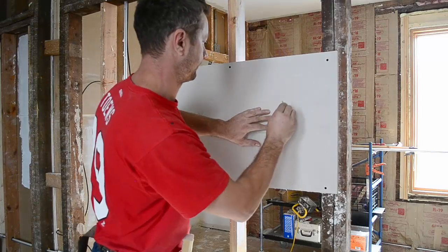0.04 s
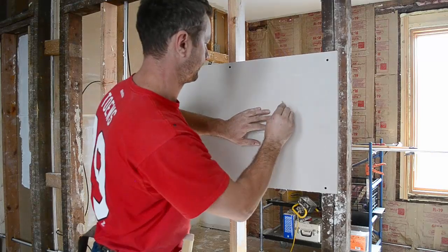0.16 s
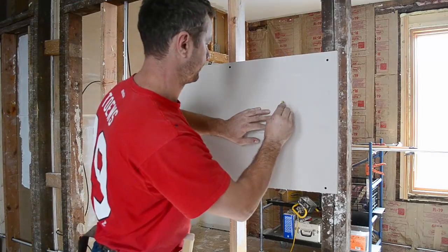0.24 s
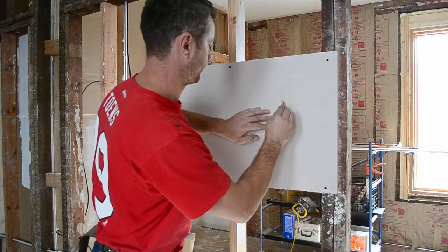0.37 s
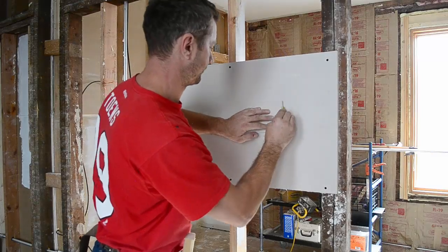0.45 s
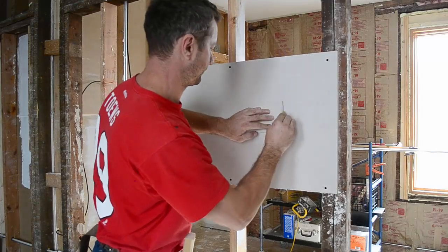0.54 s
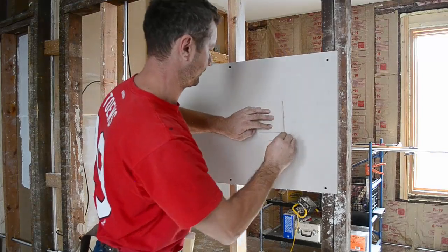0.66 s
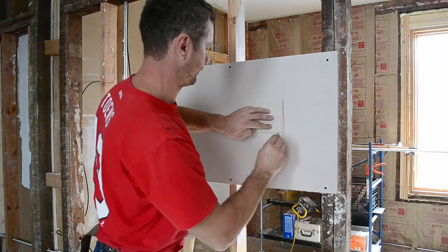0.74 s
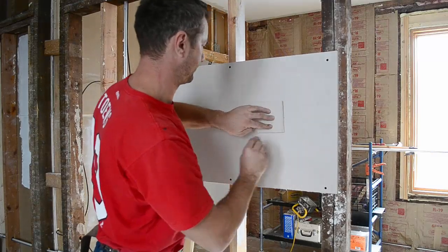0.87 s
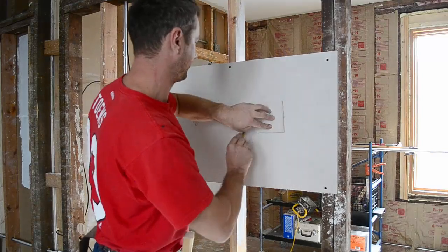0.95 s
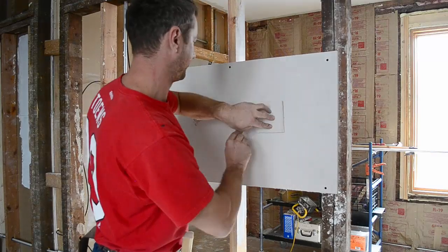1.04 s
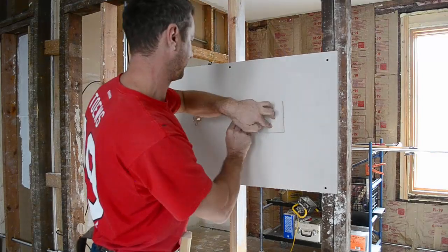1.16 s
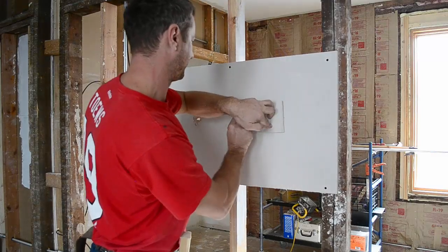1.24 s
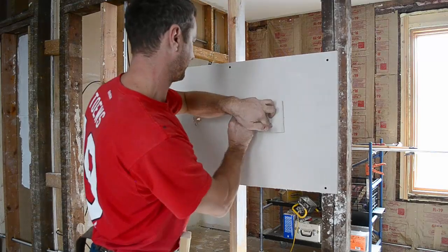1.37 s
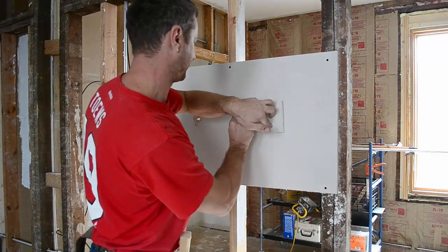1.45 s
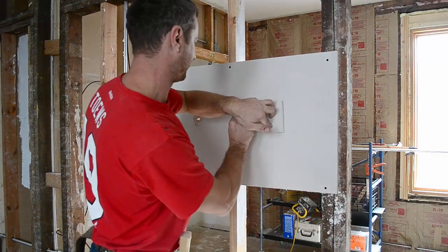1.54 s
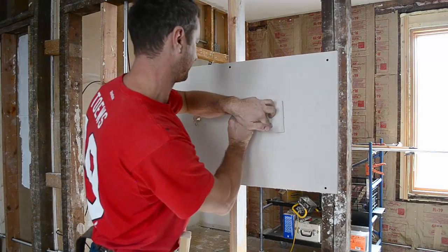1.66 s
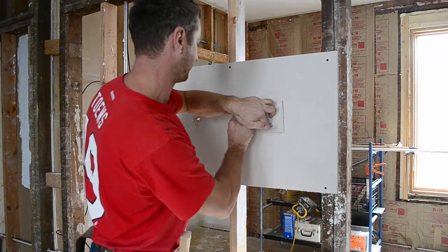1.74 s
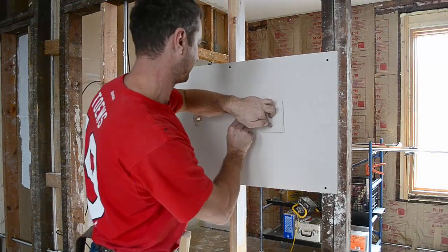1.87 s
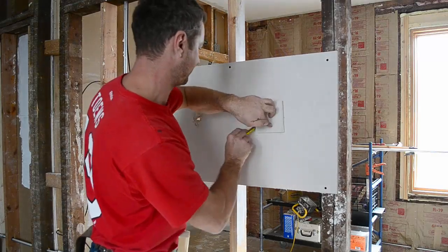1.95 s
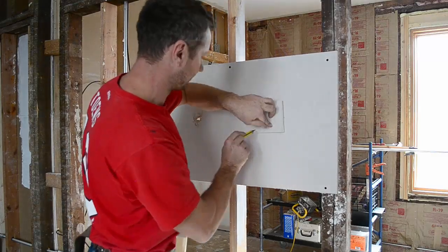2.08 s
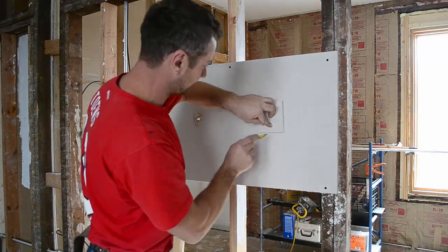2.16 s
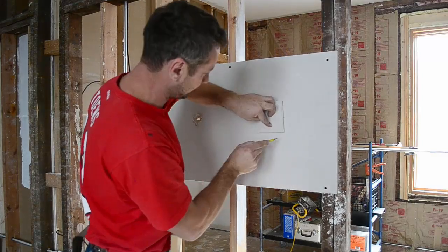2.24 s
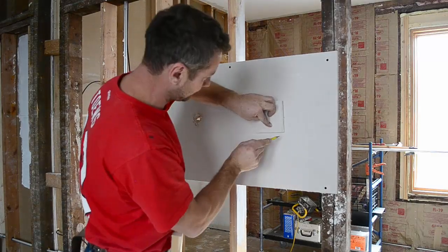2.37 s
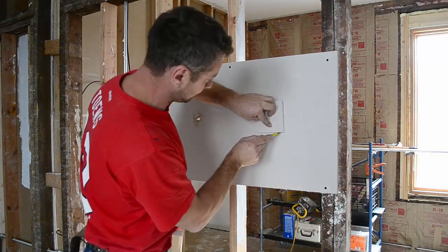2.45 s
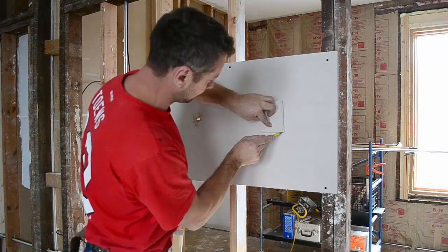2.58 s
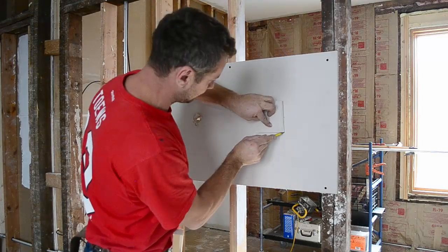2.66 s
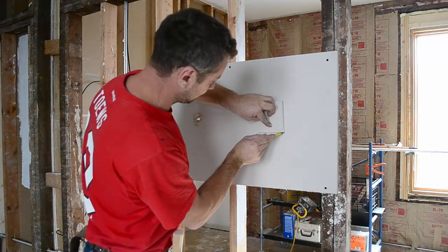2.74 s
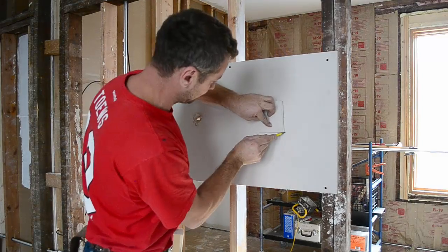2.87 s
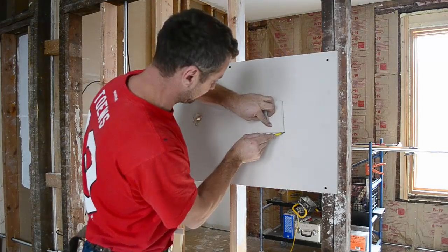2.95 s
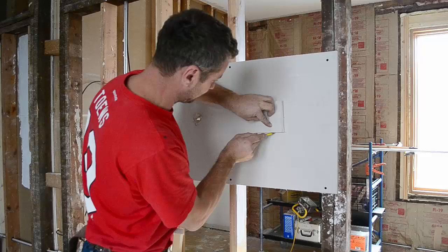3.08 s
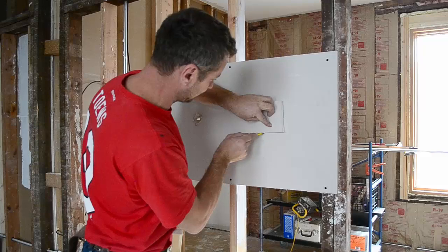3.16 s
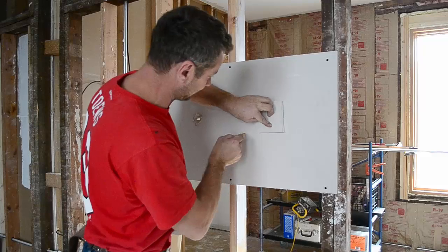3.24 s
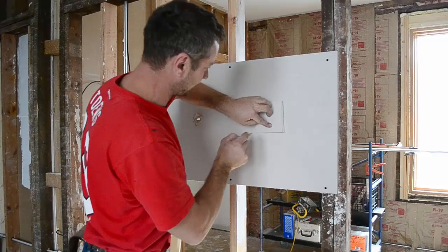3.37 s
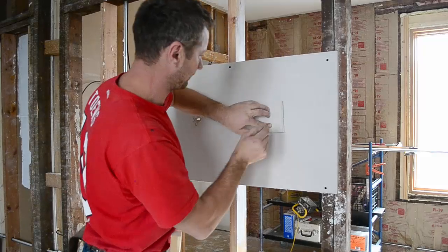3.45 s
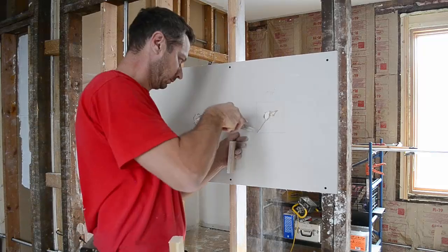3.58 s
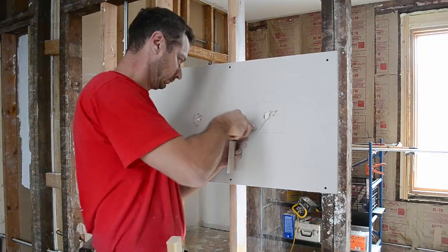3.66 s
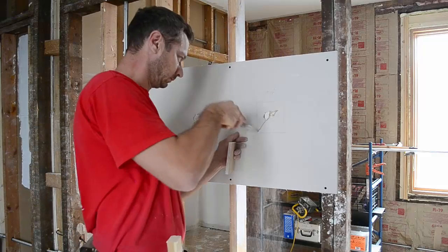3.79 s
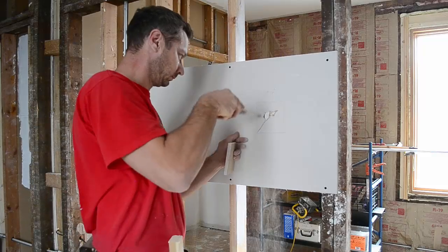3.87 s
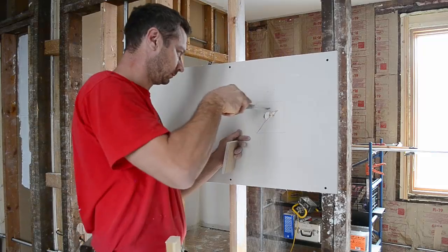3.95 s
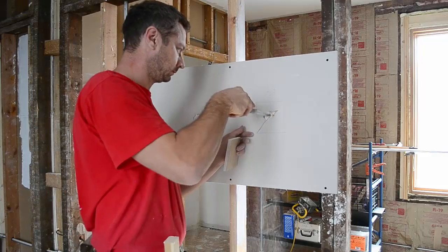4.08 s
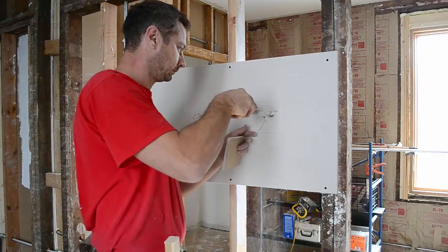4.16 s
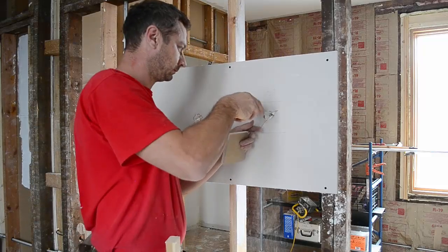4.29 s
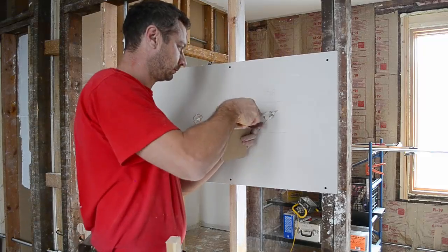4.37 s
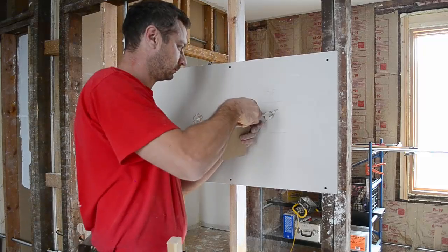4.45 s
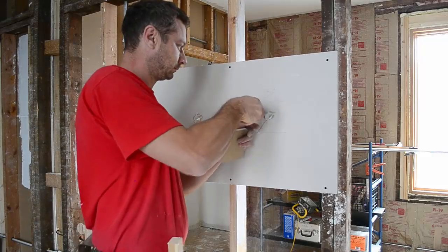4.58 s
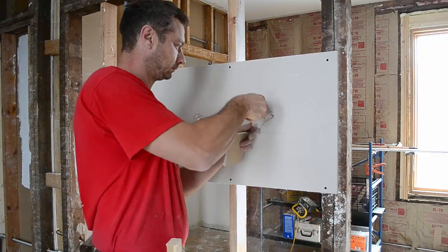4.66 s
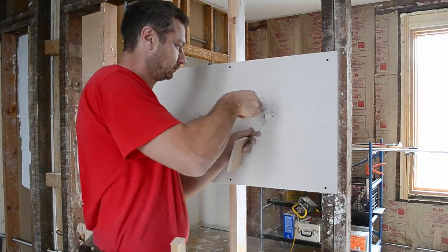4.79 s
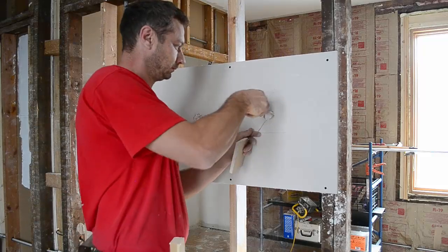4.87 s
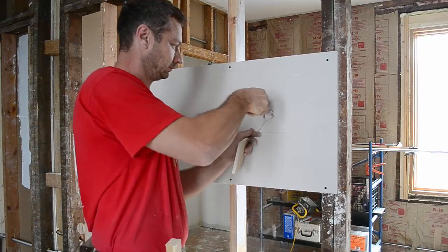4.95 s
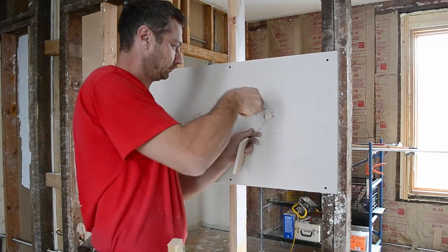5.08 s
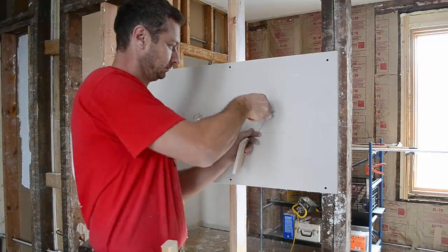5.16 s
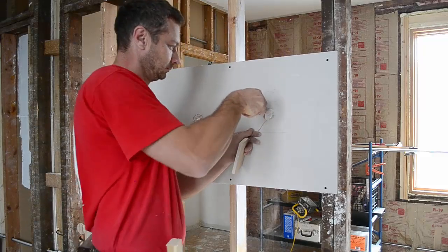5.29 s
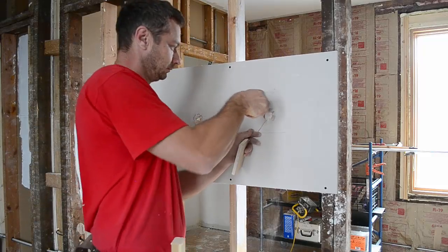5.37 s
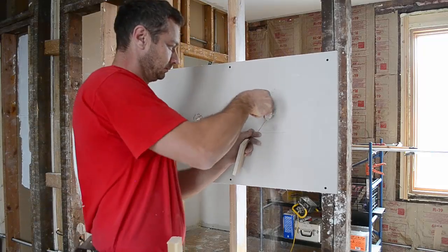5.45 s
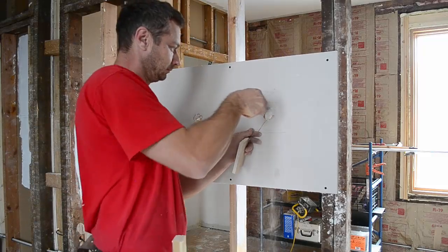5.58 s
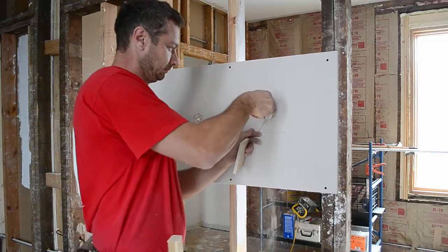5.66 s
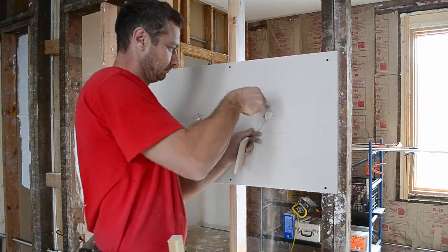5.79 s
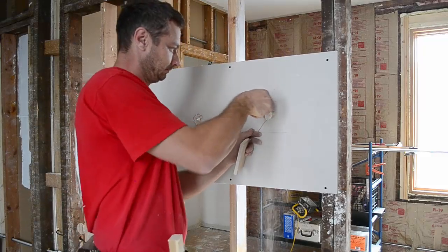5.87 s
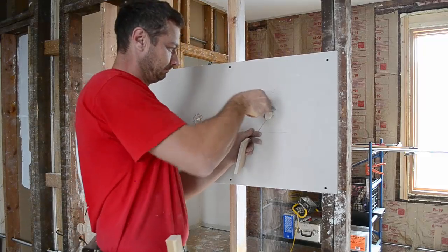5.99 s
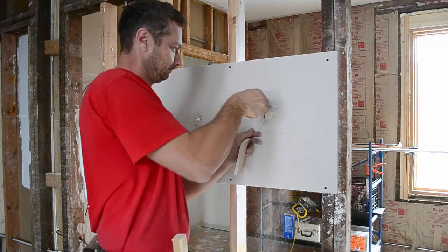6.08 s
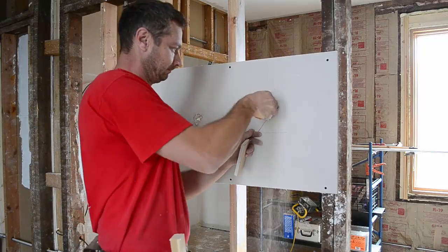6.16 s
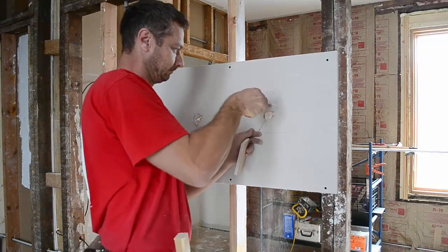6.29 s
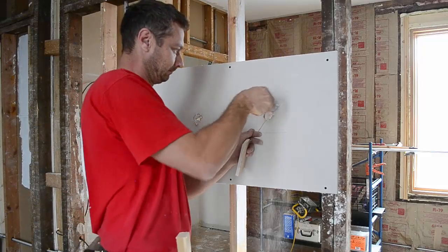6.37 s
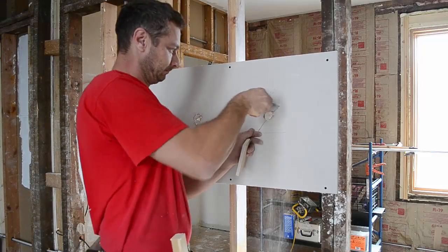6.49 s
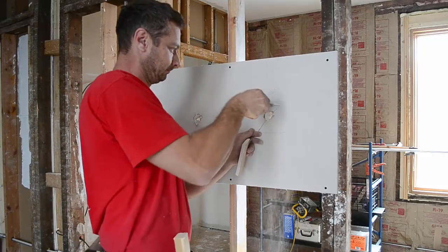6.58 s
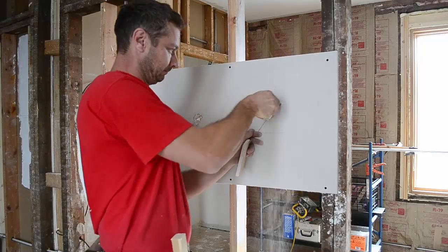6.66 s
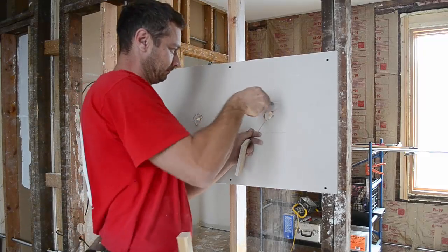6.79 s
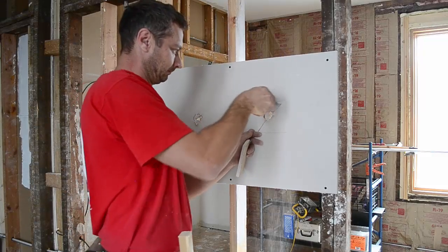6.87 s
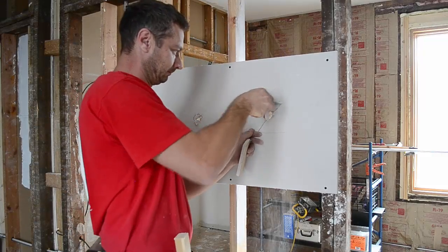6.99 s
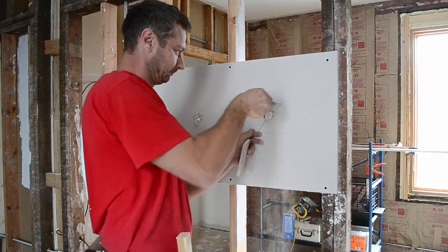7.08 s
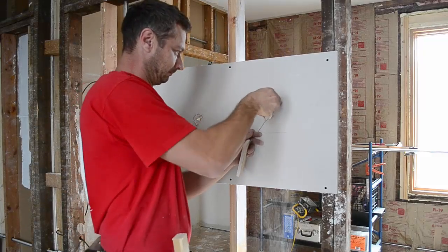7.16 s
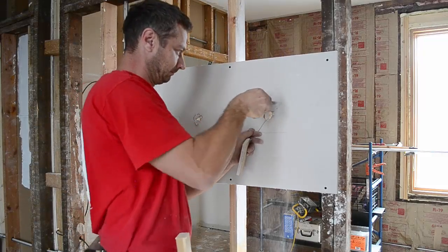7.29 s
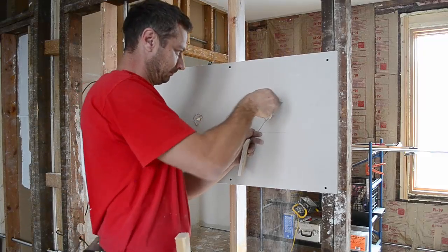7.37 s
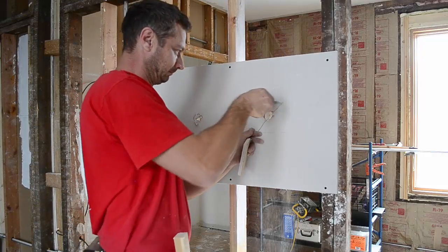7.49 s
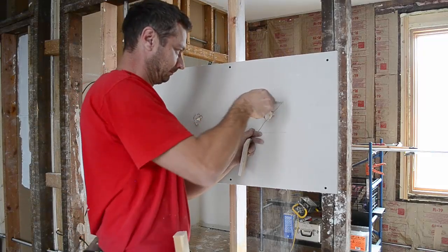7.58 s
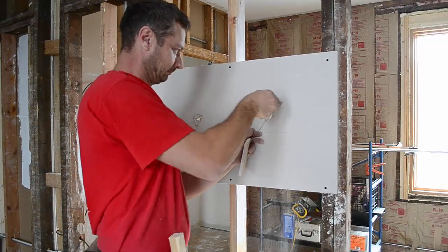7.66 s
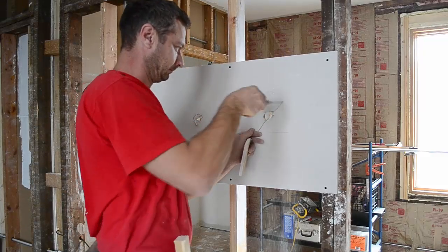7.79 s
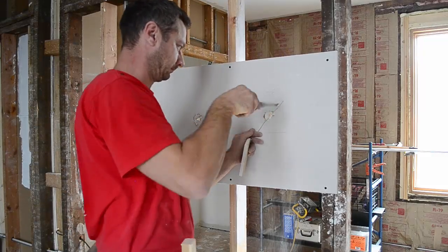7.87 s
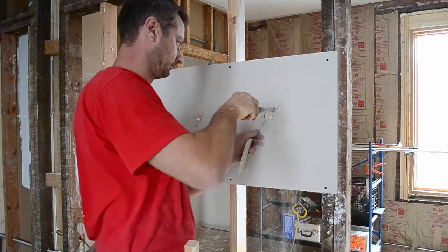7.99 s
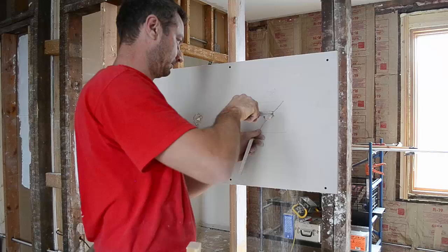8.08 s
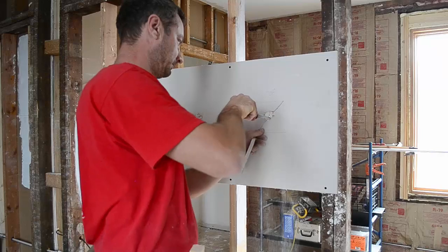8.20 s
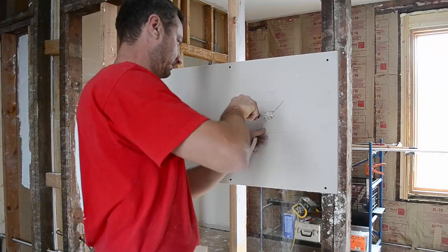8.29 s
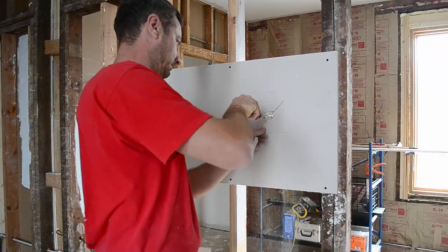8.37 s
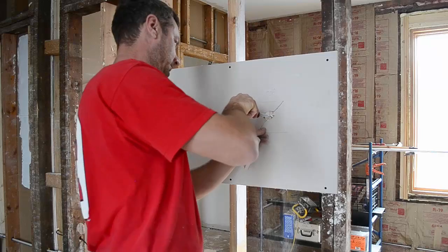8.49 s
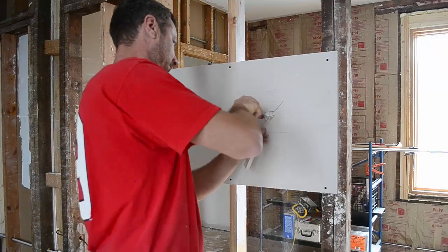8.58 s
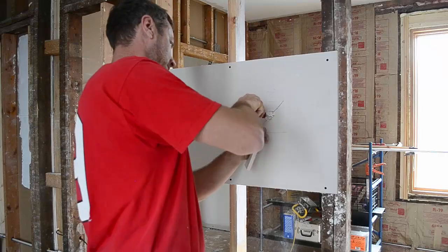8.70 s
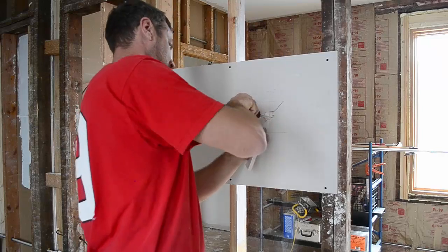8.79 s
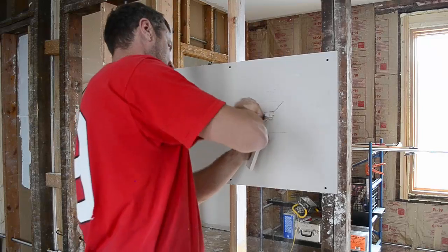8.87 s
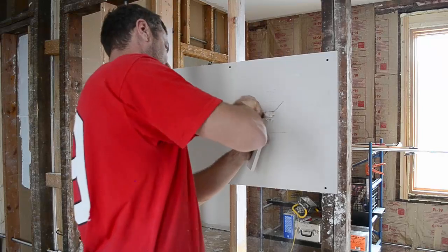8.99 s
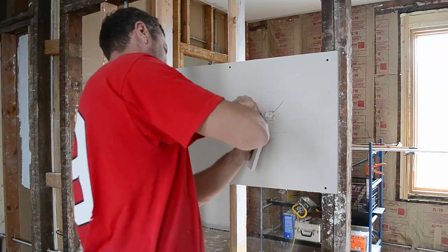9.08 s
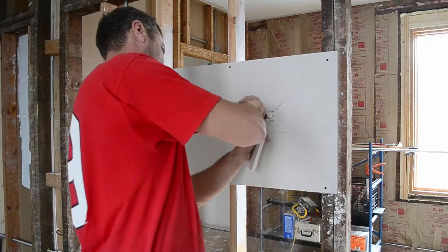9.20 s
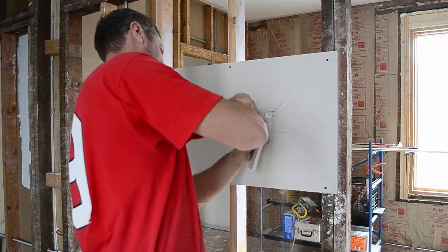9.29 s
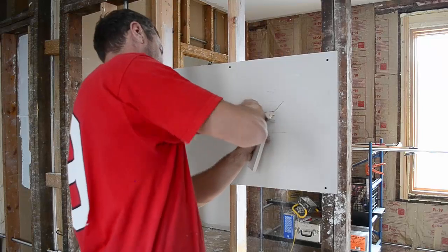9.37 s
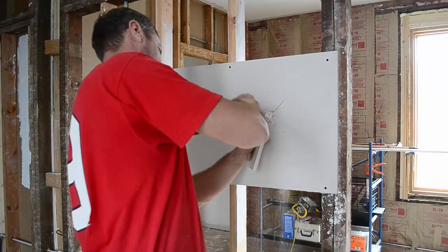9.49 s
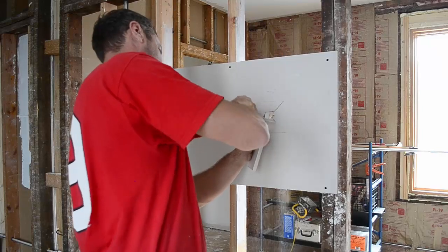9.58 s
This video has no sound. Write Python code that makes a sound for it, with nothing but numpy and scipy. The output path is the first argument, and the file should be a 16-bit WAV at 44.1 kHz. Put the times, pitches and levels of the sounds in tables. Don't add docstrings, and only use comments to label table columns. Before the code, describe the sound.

Soft steady air in a bare, short-echoing room. From 0.2 s come faint taps on a drywall sheet, then a dry pencil scratch from 0.4 to 0.7 s. Small knocks and ticks follow; a second line hisses, swelling, from 1.7 to 2.0 s, then more tiny ticks, and a third from 3.0 to 3.27 s ends in a small bright click. At 3.54 s the sound jumps abruptly to loud sawing: a couple of strokes, then blade scrapes and clicks. From 4.2 s teeth chatter sharply and knock; from 4.6 s slower strokes start, with a hard knock at 5.1 s, becoming fast regular push-pull rasps, thumping, rattling, gritty, the sheet groaning and ringing, until 7.8 s. Light rubbing and ticks fill 7.9 to 8.5 s. From 8.55 s sawing returns, rougher and more ringing, with uneven snags, continuing to the end near 9.7 s.

```python
import sys
import numpy as np
from scipy import signal
from scipy.fft import rfft, irfft
from scipy.io import wavfile
from scipy.ndimage import uniform_filter1d

SR = 44100
rng = np.random.default_rng(int(sys.argv[2]) if len(sys.argv) > 2 else 0)


def amplitude_ratio(level_db):
    exponent = np.asarray(level_db, float) / 20
    return 10 ** exponent


def bounce(signal):
    frames = np.transpose(np.atleast_2d(signal))
    limited = np.clip(frames, -1, 1)
    pcm = np.round(limited * 32767).astype(np.int16)
    wavfile.write(sys.argv[1], SR, pcm)


N = 425124
T = np.arange(N) / SR

CUTS_S = [
    3.537,
    4.181,
    8.539,
]
# time_s, peak_db
SEAMS = [
    (3.2695, -43),
    (3.5359, -53),
    (5.5363, -38),
    (6.536, -33),
    (7.5363, -47),
    (9.5376, -32),
]
# hz, level_db_per_hz
AIR_TONE = [(15, -26), (28, -12), (48, -7), (70, -15), (112, 2.5), (173, -6), (343, -2), (410, -7),
            (503, -0.5), (4960, -15), (9140, -27), (10900, -46.5), (14200, -78), (22000, -120)]
# hz, t60_s
ROOM_T60 = [(150, 0.15), (1000, 0.35), (7000, 0.33)]
# time_s, peak_db, pitch_hz
KNOCKS = [(0.1916, -37, 630), (.2755, -34.5, 720), (0.31, -35.5, 343), (.979, -48, 520), (1.146, -42, 313),
          (1.387, -37.5, 346), (1.441, -44, 620), (1.459, -36, 940), (1.735, -46, 885), (2.473, -39.5, 507),
          (2.98, -34, 830), (3.537, -10, 367), (4.596, -12, 295), (4.844, -25, 420), (5.124, -3, 586),
          (8.115, -47, 550)]
# time_s, peak_db, pitch_hz
TICKS = [(.3062, -45, 1950), (1.3194, -53, 2000), (1.3753, -44, 2750), (1.4, -43, 2700),
         (1.6102, -67, 2040), (2.4758, -50, 2820), (2.8464, -60, 2100), (3.021, -42, 1920),
         (4.032, -35, 2410), (4.062, -31.5, 2580), (4.0894, -36, 2320), (4.256, -20.5, 2920),
         (4.279, -26, 3220), (4.2894, -31, 3130), (4.344, -24, 2270), (4.3807, -24, 2120),
         (4.4677, -38, 3110), (4.4907, -27, 2110), (8.0541, -37.5, 2660)]
# time_s, peak_db, pitch_hz
SHIMMER = [(.2129, -68, 4940), (.3032, -58, 4760), (.838, -54, 4370), (1.0994, -63, 3650),
           (1.1494, -59, 4850), (1.279, -49, 3600), (1.279, -45, 5000), (1.3164, -55, 3910),
           (1.3768, -53, 4750), (1.3982, -47, 4700), (2.2468, -46, 5400), (2.3094, -60, 5990),
           (2.3974, -54, 5230), (2.7467, -49, 4960), (2.9442, -42, 5080), (3.9454, -34, 3940),
           (4.061, -34, 3600), (4.072, -39, 3920), (4.183, -27, 3790), (4.2762, -24, 3760),
           (8.4322, -34, 3500), (8.545, -41, 3642), (8.566, -34, 3860)]
# time_s, peak_db, pitch_hz, t60_s, pitch_spread_share
GLINTS = [(2.29, -55, 2950, 0.21, 0.047), (2.305, -60, 5950, 0.18, 0.039), (3.938, -40, 6800, 0.096, 0.085),
          (4.183, -26, 6460, 0.051, 0.15), (8.544, -21, 7320, 0.061, 0.31),
          (1.2775, -36, 2190, 0.076, 0.15), (1.3, -37, 2160, 0.07, 0.13), (1.275, -43, 4830, .06, .04),
          (1.275, -45, 5760, .05, .04), (1.368, -50, 4800, .08, .05), (1.4, -49, 2900, 0.11, 0.022),
          (3.258, -22, 3120, 0.062, 0.036), (3.261, -23, 2400, .06, 0.028), (4.185, -25, 3340, 0.08, 0.05),
          (4.256, -26, 1880, .1, 0.028), (4.287, -34, 3340, 0.091, 0.026), (4.49, -25, 3500, .04, 0.037),
          (8.615, -22, 3410, .06, 0.017), (9.125, -32, 3437, .12, 0.019)]
# time_s, peak_db
SNAPS = [(0.305, -44), (0.61, -32), (.6994, -42), (.8375, -45), (1.278, -37), (1.3164, -43), (2.7467, -52),
         (2.9158, -52), (2.9437, -50), (4.184, -21.5), (4.277, -24), (4.344, -33), (4.38, -23),
         (4.489, -22), (7.7982, -33), (8.4346, -31), (8.5447, -33)]
# time_s, peak_db
MORE_SNAPS = [(.2135, -50), (1.443, -52), (3.262, -30), (4.278, -4.5), (4.288, -4), (4.2935, -1), (4.299, -9),
              (4.306, -16), (4.345, -10), (4.381, -12), (4.491, -17), (4.554, -12), (4.739, 1), (5.013, -18),
              (5.39, -20), (5.662, -18), (5.786, -18), (5.876, -15), (6.104, -17), (6.677, -17), (6.769, -12),
              (7.514, -19), (8.054, -41), (8.638, -15)]
# touch_s, lift_s, touch_db, lift_db, hiss_over_board_db
PENCIL_RUBS = [(.408, .42, -54, -51, -7), (.426, .71, -47.5, -41, -5), (1.735, 2.04, -58, -41, -1),
               (2.98, 3.2, -74, -40, -0.5), (3.2, 3.27, -41, -38.5, 2.5), (.16, .18, -65, -60, -10),
               (.205, .225, -43.5, -59, -20), (.285, .33, -61, -58, -8.5), (.97, .98, -66, -68, 1),
               (1.09, 1.15, -76, -74, 7), (1.272, 1.285, -59, -62, 0), (1.37, 1.41, -71, -61.5, 1),
               (1.445, 1.47, -49, -58, -13), (1.612, 1.68, -58, -57.5, -6), (2.245, 2.265, -76, -61, -3),
               (2.473, 2.55, -69, -47, -5.5), (2.7, 2.76, -60, -58, -6.5), (2.843, 2.94, -53, -54.5, -6.5),
               (3.4, 3.49, -78, -78, 8)]
# hz, level_db_per_hz
PENCIL_TONE = [(24, -76), (40, -46), (160, -9.5), (287, -9.5), (355, -4), (418, -12.5), (505, -7.5),
               (1020, -6.5), (1830, -6.5), (2670, -14), (4800, -19.5), (9050, -25), (10900, -47),
               (14200, -67), (22000, -120)]
# hz, width_hz, level_db
PENCIL_RING = [(490, 79, 5), (900, 280, 2), (2950, 740, 6), (5000, 970, 8), (6460, 600, 3)]
# (hz, width_hz, level_db)
LINES_DRAWN = [
    (0, .39, [(740, 200, 3)]),
    (.95, 1.708, [(520, 150, 7)]),
    (2.2, 2.968, [(5000, 370, 4), (754, 200, -3)]),
    (.39, .95, [(845, 39, 2), (1080, 60, 6), (1880, 55, 0), (2770, 130, -3)]),
    (1.71, 2.2, [(850, 61, 6), (1030, 79, 5.5), (1620, 67, -4.5), (1850, 59, 3), (2740, 81, -1), (3230, 89, 6)]),
    (2.965, 4.76, [(980, 270, 6.5), (1570, 91, 3.5), (1890, 70, 6), (2300, 230, 3), (3120, 98, -4)]),
]
# touch_s, lift_s, touch_db, lift_db, hiss_over_board_db
BLADE_RUBS = [(3.8, 3.9, -27.5, -49, -6.5), (3.92, 4.014, -54, -59.5, 2.5), (4.03, 4.1, -56, -58.5, 1.5),
              (4.12, 4.165, -64, -64, -2), (4.184, 4.31, -48.5, -39.5, 6), (4.33, 4.4, -44.5, -43, 4.5),
              (4.452, 4.5, -37.5, -38.5, -3.5), (4.553, 4.58, -45.5, -35.5, 5.5),
              (7.87, 8.02, -44, -57.5, -2), (8.05, 8.15, -59, -59, 3.5), (8.184, 8.19, -69, -59.5, -0.5),
              (8.26, 8.262, -60, -59, 5.5), (8.335, 8.386, -48, -50, 5.5), (8.4, 8.53, -48, -55, 1.5)]
# hz, level_db_per_hz
BLADE_TONE = [(24, -60), (40, -29), (160, -16), (372, -12), (428, -18), (595, -12.5), (1170, -14),
              (1830, -6.5), (3220, -5), (9050, -22.5), (10900, -46.5), (14200, -52), (22000, -120)]
# hz, width_hz, level_db
BLADE_RING = [(1830, 100, 4), (2530, 314, -2), (3340, 99, -2)]
# time_s, peak_db
JOLTS = [(3.5763, -18), (3.657, -14), (3.669, -16), (4.6014, -14), (4.878, -11), (5.05, -6), (5.064, -18),
         (5.132, -10), (5.174, -11), (5.4123, -8), (5.511, -6), (5.8923, -5), (5.9, -4), (6.1607, -12),
         (6.4055, -17), (6.4225, -2), (6.434, -17), (6.5238, -8), (6.5637, -18), (6.6343, -10),
         (6.6419, -10.5), (6.681, -7), (6.8015, -1), (6.901, -8), (7.062, -16), (7.3795, -11.5),
         (7.6507, -7), (8.64, -10.5), (9.049, -17), (9.1071, -7), (9.256, -13), (9.293, -15), (9.3157, -15),
         (9.3976, -13), (9.6259, -14)]
# time_s, pitch_hz, peak_db
MOANS = [(3.563, 213, -17), (3.675, 791, -22.5), (3.671, 1045, -24), (3.68, 1830, -24), (4.627, 730, -20.5),
         (4.89, 496.7, -17), (5.154, 960, -18.5), (5.167, 240.3, -15.5), (5.307, 370.6, -17),
         (5.404, 170.2, -19), (5.788, 392, -17.5), (5.793, 808, -23), (5.886, 2450, -25),
         (5.909, 236, -13.5), (6.06, 2270, -26), (6.16, 1100, -17.5), (6.171, 393, -21),
         (6.424, 156.2, -22.5), (6.532, 850, -23), (6.653, 541, -23), (6.663, 1299, -18),
         (6.671, 1036, -17), (6.67, 2210, -24), (6.908, 366, -20), (7.152, 365.3, -15.5),
         (7.152, 890.5, -25), (7.268, 1050, -23.5), (7.274, 889, -23.5), (7.384, 858, -32),
         (7.396, 578, -24), (7.4, 359.4, -17), (7.652, 365.5, -21), (8.632, 827.6, -23), (8.631, 1305, -23),
         (8.631, 3367, -28), (8.649, 563.6, -24), (8.648, 1175, -27), (8.897, 1055, -24),
         (8.904, 169.7, -27), (8.911, 883, -19.5), (9.136, 536.7, -23), (9.154, 3497, -23.5),
         (9.166, 1204, -21.5), (9.172, 884, -19.5), (9.382, 258, -18), (9.387, 858, -22), (9.398, 540, -13),
         (9.398, 2046, -23), (9.44, 1200, -23), (9.642, 280, -19), (9.642, 528.5, -12), (9.642, 763, -17.5)]
# hz, level_db_per_hz
SAW_TONE = [(30, -78), (70, -14), (120, -13), (300, -7.5), (700, -16), (1150, -20.5), (1500, -21.5),
            (2400, -18.5), (4000, -25), (9000, -41), (11000, -60), (14000, -68)]
# hz, width_hz, level_db
BOARD_MODES = [(157.2, 16.7, 11.5), (229.3, 7.4, 8.5), (258, 6, -0.5), (342, 63, 2.5), (370, 36, 6),
               (498.4, 29, 6), (550, 60, 5.5), (598.6, 41, 6), (747, 99, 4.5), (863, 47, 6.5), (944, 55, 1),
               (1002, 97, 5), (1047, 15, 5), (1144, 23, 4.5), (1300, 55, 7.5), (1451, 16, 10),
               (1630, 22, 6.5), (1786, 63, 8.5), (1957, 42, 6), (2137, 60, 5.5), (2040, 17, -8),
               (2310, 66, 6), (2770, 29, 9), (3003, 88, 4), (3443, 51, 6), (3790, 61, 6), (4760, 43, 3)]
# (hz, width_hz, level_db)
KERFS = [
    (3.5, 4.2, [(168, 81, -1), (516, 56, 6.5), (703.8, 240, 0.5), (1079, 92, 11), (2950, 380, 2), (3670, 300, 6), (4600, 160, 6)]),
    (4.2, 6.474, [(207, 41, 0), (367, 49, 1), (2190, 310, 1)]),
    (6.472, 7.1, [(366, 45, 3), (1040, 140, 0), (1300, 90, 2.5), (2360, 270, -1)]),
    (7.097, 8.5, [(214, 57, 0), (368, 59, 4.5), (1040, 140, 1), (1300, 53, 6.5), (2310, 270, -1.2)]),
    (8.503, 9.7, [(216, 92, -3), (540, 88, 2.5), (1210, 64, 12), (1726, 72, 4.5), (3457, 60, 8), (5000, 3000, 2.5), (388, 70, -3.5), (5795, 293, 0.5)]),
]
# top_speed_s, thump_db, grit_over_thump_db
PUSHES = [(3.675, -17.5, -2), (4.617, -14.5, -11.5), (4.876, -13.5, -11), (5.15, -13, -3.5),
          (5.411, -17.5, -0.5), (5.654, -15, -4), (5.904, -14.5, -3.5), (6.149, -15, -3),
          (6.415, -17.5, -2.5), (6.656, -15.5, -3), (6.907, -19, -4), (7.145, -16.5, -2.5),
          (7.392, -18, -3), (7.637, -23.5, 2), (8.626, -16, -1), (8.901, -14.5, -6.5), (9.159, -13.5, -5.5),
          (9.399, -12.5, -6), (9.642, -15, -4)]
# top_speed_s, thump_db, grit_over_thump_db
PULLS = [(3.556, -22.5, -1.5), (3.767, -27.5, -2), (4.774, -27, 4.5), (5.05, -22.5, 1.6),
         (5.297, -19, -0.5), (5.541, -20, -0.5), (5.79, -17, -2.5), (6.054, -19, 0), (6.279, -18.5, -2),
         (6.533, -19, -2.5), (6.785, -19, -1.5), (7.043, -22.5, 1), (7.265, -20.5, -4.5),
         (7.525, -22, -2.5), (7.795, -23.5, -2.5), (8.595, -27.5, 5.5), (8.765, -23.5, -2),
         (9.045, -17.5, -4), (9.288, -22, -3), (9.517, -19.5, -5.5)]
# bite_s, depth_db, hang_s
STALLS = [(4.729, 4.5, 0.055), (4.845, 7, .015), (4.998, 8, 0.088), (5.122, -1, 0.0088), (5.501, 10, 0.031),
          (5.755, 5, 0.024), (6.0, 1.5, 0.022), (6.24, 2, 0.018), (6.87, -2, .02), (7.11, -2, 0.017),
          (7.35, 3, 0.017), (5.361, 4, 0.03), (5.607, 1.5, 0.014), (5.78, 4, 0.067), (5.864, 3.5, .015),
          (6.101, 5, 0.023), (6.495, 7, 0.018), (6.617, -2, 0.022), (6.764, -3.5, .02), (7.0, 1, 0.018),
          (7.469, 1, 0.023), (7.782, 5, 0.049), (8.734, 4, 0.12), (9.102, 7.5, 0.078), (9.256, -3.5, 0.019),
          (9.362, -3, 0.022), (9.491, 5, .02), (9.604, 8, 0.01)]
LEAD_S = [
    [0.0071],
    [0.0009],
    [0],
]
STALL_SHARE = [
    [0.91],
    [0.81],
    [0.99],
]

# rise_s, fall_s, rattle_over_thump_db
PUSH_ARM, PULL_ARM = (.047, .048, -5), (.054, .053, -5)
# landing_db_per_s, lifting_db_per_s, hiss_lifting_db_per_s, pressure_bend
PENCIL_HAND, BLADE_HAND = (1500, 310, 540, 0.2), (500, 570, 270, 0.63)
# t60_s, pitch_spread_share
KNOCK, TICK, DUST = (0.036, 0.46), (0.047, 0.161), (0.032, 0.177)
# pitch_hz, t60_s, pitch_spread_share
SNAP = (5100, 0.018, .68)


def evened(x):
    return x / np.sqrt(np.mean(x ** 2) + 1e-20)


def smooth_twice(x, size):
    return uniform_filter1d(uniform_filter1d(x, size=size), size=size)


def read(points, hz):
    f, value = np.transpose(points)
    return np.interp(np.log(hz + 1), np.log(f + 1), value)


def coloured(x, points, peaks=()):
    hz = abs(np.fft.fftfreq(8192, 1 / SR))
    db = read(points, hz) + sum(d / (1 + (2 * (hz - f) / w) ** 2) for f, w, d in peaks)
    log_gain = np.log(amplitude_ratio(np.maximum(db, -100)))
    fir = np.fft.ifft(np.exp(np.conj(signal.hilbert(log_gain)))).real[:4096]
    return signal.oaconvolve(x, fir)[:N]


def split(x, *edges_hz):
    z, hz = rfft(x), np.fft.rfftfreq(len(x), 1 / SR)
    below = [0] + [1 / (1 + (hz / e) ** 6) for e in edges_hz] + [1]
    return [evened(irfft(z * (b - a), len(x))) for a, b in zip(below, below[1:])]


def by_span(x, tone, spans):
    return sum(coloured(x * (T >= a) * (T < b), tone, peaks) for a, b, peaks in spans)


def grains(per_s, spread_db):
    u = rng.random(N)
    size = np.minimum(rng.exponential(1, N), 4)
    sign = rng.choice([-1., 1.], N)
    return evened((u < per_s / SR) * amplitude_ratio(spread_db * size) * sign)


def shifting(x, depth_db):
    z = signal.stft(x, nperseg=512)[2]
    patches = uniform_filter1d(rng.standard_normal(z.shape), size=5, axis=0)
    patches = uniform_filter1d(patches, size=12, axis=1)
    return signal.istft(z * amplitude_ratio(depth_db * evened(patches)), nperseg=512)[1][:N]


def air():
    return amplitude_ratio(-63) * evened(coloured(rng.standard_normal(N), AIR_TONE))


def echoes():
    pulses, at = np.zeros(SR // 2), np.arange(150, SR // 2 - 20, 20)
    pulses[at + rng.integers(0, 20, len(at))] = rng.choice([-1., 1.], len(at))
    hz, t, z = signal.stft(pulses, SR, nperseg=256)
    decay = amplitude_ratio(-60 * t / read(ROOM_T60, hz)[:, None])
    tail = signal.istft(z * decay, SR, nperseg=256)[1]
    return tail / np.linalg.norm(tail)


def room(x, wet_db):
    turns_per_s = 3.1
    turns = np.sqrt(2 / 3) * np.cos(np.pi * (turns_per_s * T + np.arange(3)[:, None] / 3))
    wet = amplitude_ratio(wet_db) * sum(signal.oaconvolve(x * turn, echoes())[:N] for turn in turns)
    return (x + wet) / np.sqrt(1 + amplitude_ratio(wet_db) ** 2)


def taps(rows, gain_db, rise_s, snap):
    out, t = np.zeros(N), np.arange(4000) / SR
    draws = rng.uniform(-0.974, 1, (len(rows), 2, 16))
    noises = rng.standard_normal((len(rows), len(t)))
    for (s, db, hz, t60_s, spread), z, noise in zip(rows, draws, noises):
        mode_hz = hz * np.exp(spread * z[0])[:, None]
        modes = np.sin(2 * np.pi * mode_hz * t + np.pi * z[1][:, None])
        ring = (modes / (1 + (mode_hz / 7500) ** 4)).sum(0) / 4
        ring = amplitude_ratio(-60 * t / max(t60_s, .005)) * ring * (1 - np.exp(-t / rise_s))
        ring += snap * noise * np.exp(-t / 0.00068)
        part = out[round(s * SR):][:len(t)]
        part += amplitude_ratio(db + gain_db) * ring[:len(part)]
    return out


def small_taps():
    out = taps([r + KNOCK for r in KNOCKS], -2.0, 0.00024, .05)
    out += taps([r + TICK for r in TICKS], -1.3, 0.00071, 0.041)
    out += taps([r + DUST for r in SHIMMER] + GLINTS, -1.2, 0.00058, 0.14)
    return out + taps([r + SNAP for r in SNAPS], 0.0, .0002, 0.087)


def more_snaps():
    return taps([r + SNAP for r in MORE_SNAPS], -19.5, 0.00024, .28)


def pressure(rows, hand):
    landing, lifting, hiss_lifting, bend = hand
    power = np.zeros((2, N))
    for touch, lift, touch_db, lift_db, hiss_db in rows:
        near = slice(round((touch - .12) * SR), round((lift + .3) * SR))
        t = T[near]
        progress = np.clip((t - touch) / max(lift - touch, 1e-3), 0, 1)
        db = touch_db + (lift_db - touch_db) * progress ** bend
        db = db - landing * np.maximum(touch - t, 0)
        db = db - np.outer([lifting, hiss_lifting], np.maximum(t - lift, 0))
        uncut = ~np.any([(t < c) ^ (touch < c) for c in CUTS_S], axis=0)
        power[:, near] += uncut * amplitude_ratio(db + [[0], [hiss_db]]) ** 2
    return np.sqrt(power)


def rub(rows, hand, tone, spans, per_s, spread_db):
    bands = split(by_span(grains(per_s, spread_db), tone, spans), 1320)
    return shifting((pressure(rows, hand) * bands).sum(0), 1.13)


def pencil():
    spans = [(a, b, PENCIL_RING + peaks) for a, b, peaks in LINES_DRAWN]
    return rub(PENCIL_RUBS, PENCIL_HAND, PENCIL_TONE, spans, 4500, 2.3)


def blade():
    return rub(BLADE_RUBS, BLADE_HAND, BLADE_TONE, [(0.0048, 10, BLADE_RING)], 3500, 2.4)


def jolts():
    dent_hz, in_s, out_s = 420, 0.00018, 0.00046
    t, (s, db) = np.arange(-200, 600) / SR, np.transpose(JOLTS)
    dent = -np.cos(2 * np.pi * dent_hz * t) * np.exp(-abs(t) / np.where(t < 0, in_s, out_s))
    dent = signal.sosfilt(signal.butter(2, 110, "high", fs=SR, output="sos"), dent)
    train = np.zeros(N)
    train[np.round(s * SR).astype(int) - 200] = amplitude_ratio(db)
    return signal.oaconvolve(train, dent)[:N]


def moans():
    swell_s, wander_hz, flutter_db, gain_db = 0.025, 27.1, 1, 1
    out, t = np.zeros(N), np.arange(-4000, 4000) / SR
    for (s, hz, db), z in zip(MOANS, rng.standard_normal((len(MOANS), len(t)))):
        pitch_hz = hz + wander_hz * evened(smooth_twice(z, 500))
        level_db = db + flutter_db * evened(smooth_twice(z[::-1], 200))
        level_db = level_db + gain_db - 9.6 * (t / swell_s) ** 2 / 2
        moan = amplitude_ratio(level_db) * np.sin(2 * np.pi * np.cumsum(pitch_hz) / SR)
        part = out[round(s * SR) - 4000:][:len(t)]
        part += moan[:len(part)]
    return out * (T > CUTS_S[0])


def strokes():
    rattle_per_grit, rattle_db_per_s = 0.53, 1.02
    beat_s, stretch, rest_s = .125, .3, .085
    power, speed = np.zeros((3, N)), np.zeros(N)
    tops = [r[0] for r in PUSHES + PULLS]
    rows = [r + PUSH_ARM for r in PUSHES] + [r + PULL_ARM for r in PULLS]
    for s, db, grit_db, rise, fall, rattle_db in rows:
        kerf_age_s = s - max(c for c in CUTS_S if c < s)
        rattle_db += rattle_per_grit * grit_db + rattle_db_per_s * kerf_age_s
        before, after = (min([abs(p - s) for p in tops if 0 < side * (p - s) < 2 * beat_s] or [rest_s])
                         for side in (-1, 1))
        rise, fall = rise + stretch * (before - beat_s), fall + stretch * (after - beat_s)
        start = max(c for c in CUTS_S + [s - .2] if c < s)
        near = slice(round(start * SR), round((s + 0.28) * SR))
        away = T[near] + LEAD_S - s
        away = away / np.where(away < 0, rise, fall)
        depth_db = np.array([[10.5], [11.], [8.]]) * away ** 2
        power[:, near] += amplitude_ratio(db + np.array([[0], [rattle_db], [grit_db]]) - depth_db) ** 2
        speed[near] = np.maximum(speed[near], np.exp(-away[2] ** 2))
    for s, db, hang in STALLS:
        near = slice(round((s - .2) * SR), round(s * SR))
        stall = np.exp(-((s - T[near]) / hang) ** 2)
        power[:, near] /= amplitude_ratio(db * np.array(STALL_SHARE) * stall) ** 2
    return np.sqrt(power), speed


def saw():
    gains, speed = strokes()
    jitter_db = 4. * evened(uniform_filter1d(rng.standard_normal(N), size=300))
    turns = np.cumsum((90 + 170 * speed) * amplitude_ratio(jitter_db)) / SR
    teeth = np.diff(np.floor(turns), prepend=0) * amplitude_ratio(2.42 * rng.standard_normal(N))
    teeth = smooth_twice(teeth, 24)
    crumbs = grains(6000, 1.5) * (.5 + np.exp(-(turns % 1) / .3))
    cut = evened(crumbs) - 2.58 * teeth / teeth.max()
    bands = split(coloured(cut, SAW_TONE), 765, 1654)
    bite = shifting((gains * bands).sum(0), 0.71)
    spans = [(a, b, BOARD_MODES + peaks) for a, b, peaks in KERFS]
    rung = by_span(bite, [(40, -50.0), (75, -23.0), (115, -8.0)], spans)
    return np.std(bite) * evened(rung)


def scene():
    hands = pencil() + blade()
    sawing = saw() + moans() + amplitude_ratio(-3.0) * jolts()
    out = air() + room(more_snaps(), -19.0) + room(small_taps(), -2.0) + room(hands, -2.4)
    return (out + amplitude_ratio(0.28) * room(sawing, -4.5))[None]


def low_pass(x):
    return signal.sosfilt(signal.butter(12, 15570, fs=SR, output="sos"), x)


def record(dry):
    hz = [0, 7300, 7900, 8500, 10600, 11300, SR / 2]
    gain_db = np.array([-1.5, -2.0, -5.5, -1.0, 5.5, -75, -80])
    mic = signal.firwin2(511, hz, amplitude_ratio(gain_db), fs=SR)
    out = signal.oaconvolve(1.22 * np.tanh(dry / 1.272), mic[None], "same")
    out = signal.sosfilt(signal.butter(2, 55, "high", fs=SR, output="sos"), out)
    s, db = np.transpose(SEAMS)
    out[:, np.round(s * SR).astype(int)] += amplitude_ratio(db + 16.)
    return low_pass(out)


dry = scene()
out = record(dry)
bounce(out)
```